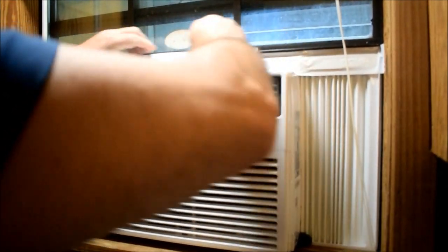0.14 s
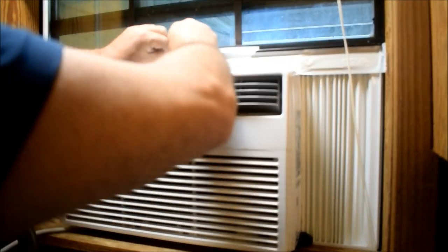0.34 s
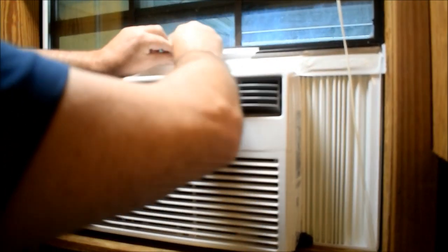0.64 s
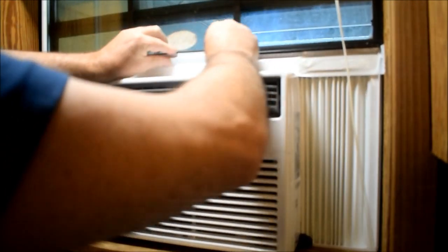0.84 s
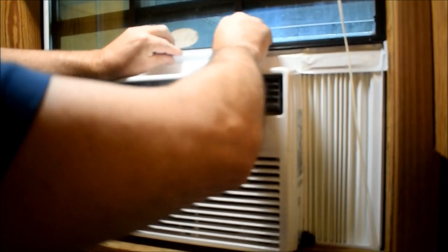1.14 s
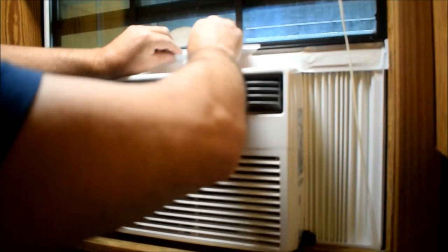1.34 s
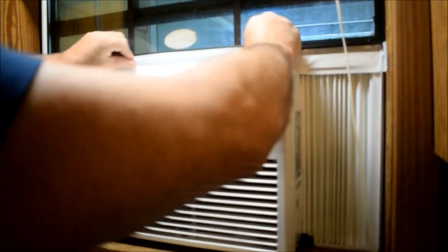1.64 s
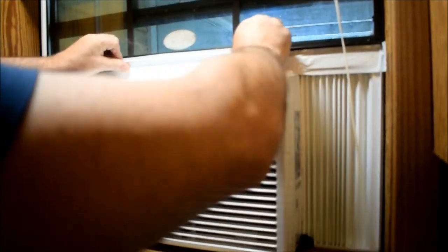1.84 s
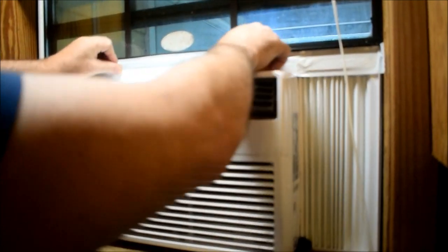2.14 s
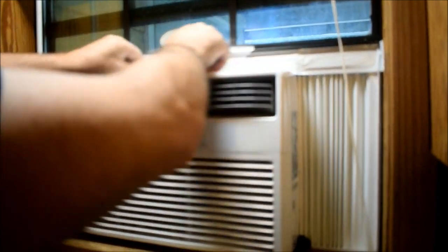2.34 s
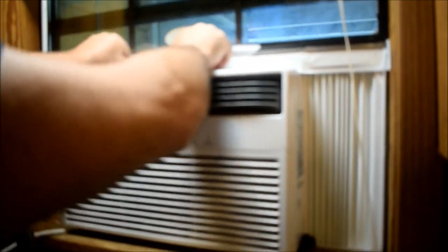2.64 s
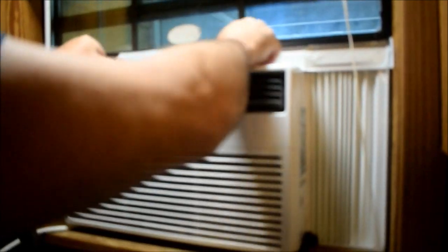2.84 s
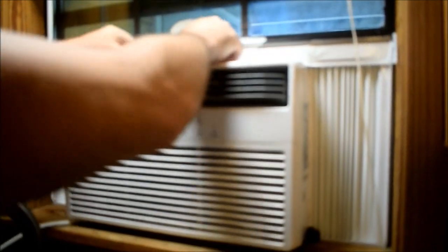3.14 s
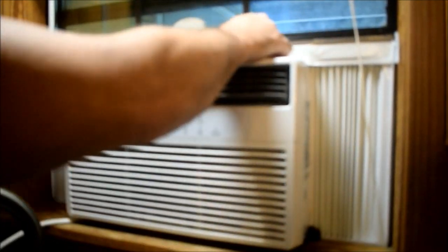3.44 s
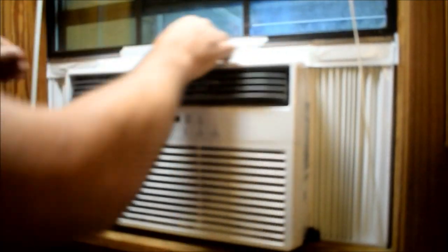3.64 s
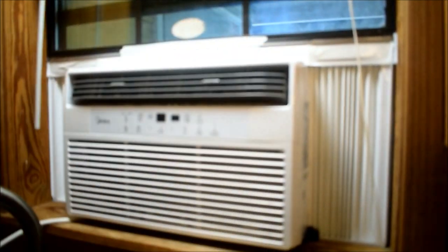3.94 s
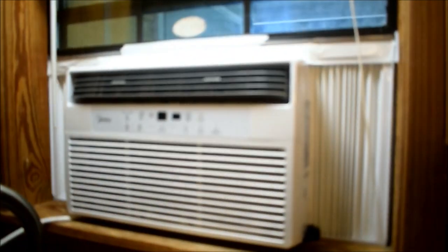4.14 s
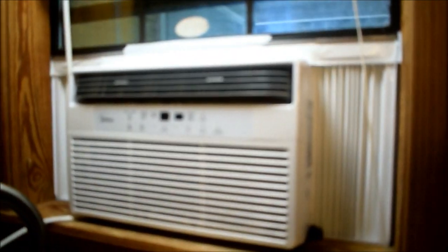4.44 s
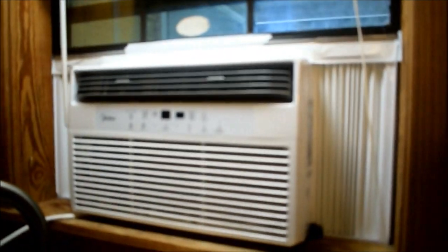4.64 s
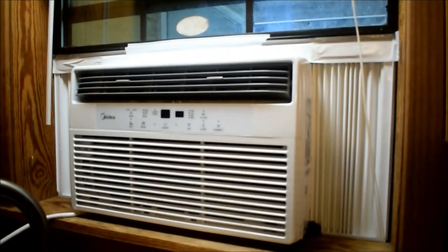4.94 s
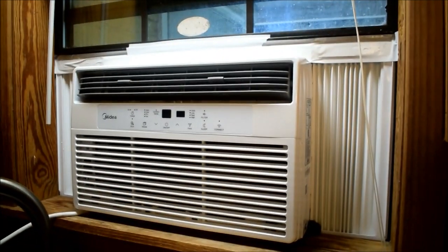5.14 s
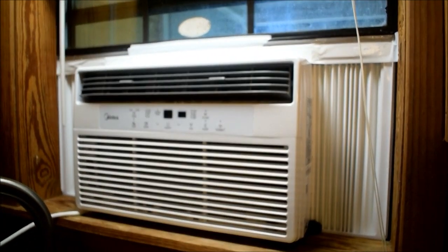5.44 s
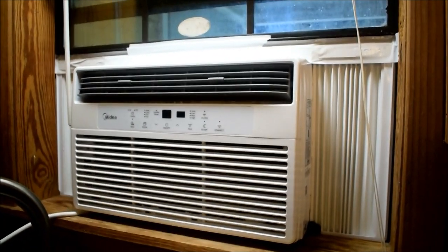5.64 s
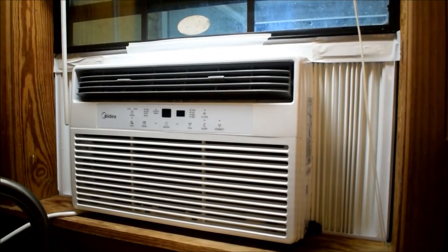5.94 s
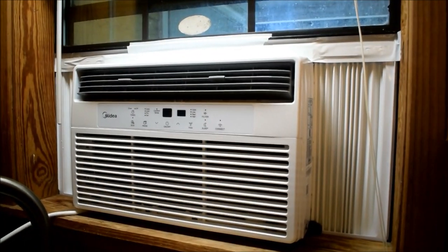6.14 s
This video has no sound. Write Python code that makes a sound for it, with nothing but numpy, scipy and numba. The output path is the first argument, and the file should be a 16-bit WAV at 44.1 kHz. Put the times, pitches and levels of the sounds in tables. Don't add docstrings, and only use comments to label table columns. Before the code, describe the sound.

Quiet knocks, tape crinkles and small plastic ticks in a small humming room, ending in a sudden harsh, distorted rip of adhesive tape.

```python
import sys
import numpy as np
from scipy import signal
from scipy.fft import rfft, irfft, next_fast_len
from scipy.io import wavfile
from numba import njit

SR = 44100
rng = np.random.default_rng(int(sys.argv[2]) if len(sys.argv) > 2 else 0)


def invert_db(level):
    return 10 ** (np.asarray(level, dtype=float) / 20)


def file_out(sig):
    cols = np.atleast_2d(sig).T
    lim = np.clip(cols, -1, 1)
    pcm = np.round(lim * 32767).astype(np.int16)
    wavfile.write(sys.argv[1], SR, pcm)


N = 276948

# (time [s], level [dB], hold [ms], strip mode [Hz]); the last row's mode holds from
# 5.981 s on
SLIPS = [(5.6105, -27.5, 1.1, 2230), (5.8054, -14.5, 2.1, 8800), (5.8462, -12.5, 3.4, 6530),
         (5.8902, -8, 5.1, 6000), (5.903, -16, 4.4, 3420), (5.916, -15, 2.7, 6000), (5.9272, -7, 7.3, 1730),
         (5.947, -10, 7.7, 1900), (5.957, -9.5, 10, 3600), (6.012, -10, 6, 1620), (6.02, -6, 15, 2900),
         (6.041, -3, 6, 4320), (6.052, -6.5, 7, 3030), (6.064, -5, 27, 4300), (6.082, -2.5, 20.5, 3500),
         (6.1161, -0.5, 17.4, 3500), (6.1537, -1.3, 15.6, 4170), (6.1917, -2, 6.2, 2050),
         (6.2214, -1, 4.5, 2210), (6.238, -2, 6.1, 4100), (6.2545, -2.5, 6.8, 2220),
         (6.265, -5.5, 5.9, 2200), (6.277, -7, 4.8, 4030), (5.981, -11, 4, 2610)]
# (time [s], tearing [dB], drum pitch of the free strip [Hz], drum rattle [dB], clean swing [dB])
PULL = [(5.88, -59, 979, -49, -70), (5.93, -28, 922, -33, -60), (5.955, -18, 900, -24, -28),
        (5.98, -9, 670, -23.5, -22), (6.0, -2, 594, -18, -18), (6.012, -12, 468, -19, -27),
        (6.025, -11, 316, -25, -10), (6.04, -17, 304.5, -24, -9), (6.062, -26, 291, -28, -10),
        (6.085, -26, 223, -24, -7.5), (6.098, -40, 216, -40, -30), (6.11, -48, 237, -47, -70),
        (6.28, -43, 262, -43, -70)]
# (frequency [Hz], density [dB per Hz])
SHORT_STRIP_COLOUR = [(210, -55), (350, -22), (1400, -11), (1900, -4), (2650, -6), (3530, -3), (6270, 0),
                      (9950, 2.5), (15800, -15)]
# (frequency [Hz], density [dB per Hz])
LONG_STRIP_COLOUR = [(220, -56), (380, -1), (424, 2.5), (527, -3), (698, 0.5), (1600, -8.5), (4260, -11),
                     (5730, -7), (9440, -3.5), (15800, -13.5)]
# (frequency [Hz], width [Hz], boost [ratio])
STRIP_MODES = [(1900, 1700, 4.9), (3600, 1900, 8.9), (6300, 170, 2.1), (7660, 220, 0.61)]
# (time [s], peak level [dB])
SNAPS = [(5.370, -26.5), (5.3735, -40), (5.380, -34), (5.3859, -29), (5.391, -30), (5.3945, -25),
         (5.3995, -24), (5.404, -28), (5.410, -25), (5.415, -22), (5.4225, -20), (5.431, -20), (5.436, -17),
         (5.4394, -15), (5.447, -17), (5.4533, -25), (5.458, -16), (5.461, -12.5), (5.4709, -16.5),
         (5.6115, -9.5), (5.6145, -20), (5.721, -36), (5.8057, 1), (5.8225, -17), (5.8245, -20),
         (5.8466, 3), (5.8488, -11), (5.8499, 1), (5.8923, -10), (5.8978, 0), (5.9031, -13), (5.908, -2),
         (5.9155, -5), (5.9177, 2), (5.9264, -11), (5.9465, 0), (6.1165, 3), (6.1537, -4), (6.1924, -5),
         (6.2212, 6), (6.239, -1), (6.2545, -2)]
# (frequency [Hz], width [Hz], share [ratio])
SNAP_MODES = [(1900, 470, .6), (3600, 570, 0.94), (6300, 1600, 0.47), (9670, 5200, 0.39)]
# (time [s], peak level [dB], pitch [Hz])
FLAPS = [
    (6.098, -13, 225),
    (6.124, -9, 240),
    (6.134, -9.5, 188),
    (6.165, -5, 248),
    (6.195, -5.5, 245),
    (6.223, -1, 273),
    (6.24, -9, 260),
    (6.259, -2, 250),
    (6.271, -10, 267),
]
# (start [s], rise [s], level [dB], t60 [s], low mode of the strip [dB], hold [s])
PEELS = [
    (0.111, 0.0064, -32, 0.36, -64, 0.018),
    (5.383, 0.046, -29.5, 0.11, -37.5, 0.039),
]
# (frequency [Hz], density [dB per Hz])
PEEL_COLOURS = [
    [(880, -49), (1500, -24), (2340, -15), (2480, -13), (4750, 0), (7260, -9), (15800, -44)],
    [(760, -41), (1300, -10), (2700, -5.5), (3510, -6.5), (6990, -4.5), (11000, -7), (15800, -19)],
]
LOW_MODE_TIME = (5.41, 5.45)
LOW_MODE_PITCH = (1900, 900)
# (time [s], body [dB], tick re body [dB], contact [ms], body pitch [Hz])
TAPS = [(0.202, -29.5, 0, 16.5, 977), (0.602, -26.5, 2, 5.54, 1150), (0.679, -14, -6.5, 4.7, 900),
        (0.728, -14.5, -6.5, 2.4, 610), (0.783, -33, -12, 2.6, 800), (0.832, -18, -17, 3.1, 720),
        (0.879, -32, -7, 2.1, 710), (0.895, -14, -13, 3.2, 870), (0.935, -31, -3.5, 4.6, 540),
        (1.108, -31.5, -7, 13.6, 1350), (1.16, -32.5, -4.5, 15, 795), (1.373, -28.5, -7, 4.2, 605),
        (1.466, -32.5, -6, 8.1, 553), (1.492, -32.5, -8, 4.7, 710), (1.633, -27, -20, 7.5, 775),
        (2.555, -34.5, -8, 5.1, 680), (3.187, -34, 1, 8.2, 450), (4.269, -39, -9, 33, 950)]
# (time [s], thump [dB], body re thump [dB], contact [ms])
THUMPS = [(0.009, -35, -19, 6.9), (0.516, -31, -3.5, 6.4), (1.334, -21.5, 3, 7.7), (1.97, -24.5, 4, 5.5),
          (2.265, -42.5, 6, 15), (2.41, -27, -5.5, 8.6), (2.447, -36, 4.5, 10.6), (2.61, -40.5, 1, 5.2),
          (3.102, -32.5, 0.5, 10), (3.131, -19.5, -2.5, 5), (3.158, -27, -7, 13), (4.377, -33, -25, 3.6),
          (4.496, -35.5, -19, 0.85), (5.785, -37.5, 4, 8.6)]
# (time [s], tick [dB], snap re tick [dB], contact [ms])
CRINKLES = [(0.009, -50, 7, 7.7), (0.357, -37, -2.5, 9.5), (0.367, -34.5, 0, 5.5), (0.21, -37, 3, 13),
            (0.443, -47, 2, 6), (0.452, -38, -4, 12), (0.517, -33.5, 1, 9.1), (0.68, -37.5, 9.5, 5.9),
            (0.698, -19.5, -6.5, 5.2), (0.899, -28.5, -16, 4.5), (1.106, -38, 2.5, 10.5),
            (1.335, -24, -7, 3.3), (1.633, -40, 1, 10), (1.971, -34.5, -8, 6.4), (2.029, -42.5, -4, 4.1),
            (2.191, -28.5, -32, 5.9), (2.509, -37.5, -5, 8.3), (3.131, -28, -15, 8.7),
            (3.246, -39, -5.5, 9), (3.992, -28, -25, 5.5), (4.32, -43, -26, 17), (4.567, -43, -3.5, 2.9),
            (5.6105, -21.5, -9, 8), (1.3398, -34, -8, 2.8), (1.347, -33, -12, 2.7), (1.976, -37, -9, 3.1),
            (3.138, -34, -10, 3), (3.342, -41, -6, 4), (2.648, -44, -2, 4)]
# (low edge [Hz], high edge [Hz], ring [contact lengths], mode sharpness [Q])
CASING = [
    (340, 1390, 1.1, 3.6),
    (80.4, 403, 3.5, 0.87),
    (1420, 4480, .9, 2.3),
    (4140, 11000, .7, 4.7),
]
# (time [s], lower mode [dB], upper modes [dB])
TICKS = [
    (3.454, -35, -66),
    (3.9943, -24, -33),
    (4.3214, -29, -42.5),
    (4.6029, -34, -57),
    (4.8399, -43, -65),
    (4.865, -47, -66),
    (4.8928, -46, -64),
    (4.912, -49, -62),
    (5.0155, -46, -65),
]
# (frequency [Hz], level [dB], t60 [s], strength column of TICKS [index])
TICK_MODES = [(2040, -9, .018, 1), (3600, -1.5, .012, 2), (3650, -24, .2, 2), (4300, 0, .01, 2)]
# (start [s], rise [s], level [dB], t60 [s], stop [s])
SQUEAK = (0.732, .012, -48.5, .8, .895)
# (frequency [Hz], width [Hz], level [dB])
SQUEAK_MODES = [(1340, 160, -2), (1990, 150, 0), (4680, 330, -3)]
# (start [s], rise [s], hold [s], level [dB], hollowness [dB])
STROKES = [(0.0, 0.0016, 0.011, -55, 5.5), (0.314, 0.037, 0.2, -53, 0), (0.6, 0.083, 0.11, -44.5, -5),
           (0.808, .09, 0.034, -45, -11), (1.057, 0.018, 0.22, -52.5, -2), (1.31, 0.024, 0.11, -47.5, 2),
           (1.361, 0.1, 0.18, -44, -4), (1.68, .02, 0.088, -57.5, 1.5), (1.768, 0.079, 0.066, -53, -2.5),
           (1.954, 0.033, 0.22, -57.5, 2), (2.42, 0.34, .015, -44.5, 9), (2.6, 0.04, .13, -51, 5.5),
           (3.099, 0.03, 0.028, -50.5, 0), (3.199, 0.092, 0.082, -48.5, 8), (3.396, 0.018, 0.07, -58.5, 5),
           (3.52, 0.024, 0.043, -58, -1), (3.97, .02, 0.047, -58, -1), (4.048, 0.085, 0.13, -58, 5),
           (5.584, 0.016, 0.12, -51.5, -15), (5.769, 0.039, 0.12, -49.5, -1)]
# (start [s], rise [s], hold [s], hiss [dB], t60 [s])
SWISHES = [(0.0, 0.0015, 0.0089, -62, 0.15), (0.11, 0.024, .01, -48, 0.32), (0.2, .008, 0.017, -59, 0.14),
           (0.343, 0.016, 0.0092, -76, 0.071), (0.5, 0.015, 0.0085, -68, .18),
           (0.75, 0.041, 0.12, -74, 0.47), (1.087, 0.019, 0.0079, -57, 0.099),
           (1.63, 0.023, 0.021, -50.5, 0.11), (2.058, 0.036, 0.018, -66, 0.17),
           (2.162, 0.026, .005, -54, 0.059), (2.235, 0.043, 0.073, -68, .4), (2.565, 0.031, .02, -54, .2),
           (2.658, 0.023, 0.02, -49, 0.25), (3.326, 0.024, 0.025, -58, 0.13),
           (3.525, 0.013, 0.037, -68, .3), (4.476, .03, 0.018, -69, .15), (5.255, 0.11, 0.058, -63, 0.22),
           (5.372, 0.0026, 0.0069, -38, 0.16), (5.376, 0.025, 0.06, -41, 0.22),
           (5.72, 0.0025, .004, -58, .12), (5.625, .02, 0.11, -77, 0.62)]
# (rumble [dB], whoosh [dB], rub [dB], hiss [dB])
REST_LEVELS = (-60.5, -60.5, -60.5, -67)
# (rumble [dB], whoosh [dB], rub [dB], hiss [dB])
HANDS_OFF_CHANGE = (-0.71, -0.31, -1.2, -0.35)
# (frequency [Hz], density [dB per Hz])
FLOOR_COLOUR = [(15, -28), (25, -3.5), (59, 4.5), (137, -14), (179, -7.5), (342, -12.5), (981, -29),
                (1320, -24), (3490, -36), (4210, -43), (7420, -62), (13400, -64), (15800, -65)]
# (frequency [Hz], width [Hz], level [dB])
HUM_TONES = [(56.2, 8.2, -48.5), (113.6, 16.3, -52.5)]
# (time [s], level [dB])
MOTOR_LEVEL = [(0.0, -48.5), (0.68, -54), (1.48, -47.5), (3.0, -52.5), (5.36, -54), (5.8, -57.5)]
# (start [s], rise [s], hold [s], level [dB], t60 [s], pitch [Hz])
HUM_SWELL = (4.0, 0.36, 0.3, -48, 0.1, 116)


def rip():
    tear_db, drum_hz, drum_db, swing_db = in_time(PULL)
    now = np.arange(N) / SR
    pulling = now > PULL[0][0]
    tearing, mode_hz = slip_bursts(invert_db(tear_db) * pulling)

    snaps = crackle(per_s=7000, spread_db=4) * invert_db(3.5 * drift(260) + 2.5 * drift(75))
    ringing = sum(boost * resonance(snaps, hz, width) for hz, width, boost in STRIP_MODES)
    snaps = rms_one(snaps + 0.16 * ringing)

    length = np.clip((now - 5.91) / 0.051, 0, 1)
    colour = (1 - length) * coloured(snaps, SHORT_STRIP_COLOUR) + length * coloured(snaps, LONG_STRIP_COLOUR)
    colour = rms_one(colour + 1.29 * gliding(colour, mode_hz, 2.4, SR))

    rattle = (invert_db(drum_db) * pulling + invert_db(-31) * (now > PULL[-3][0])) * snaps
    drum = gliding(gliding(rattle, drum_hz, 3.6, SR), drum_hz, 3.6, SR)
    overtone = gliding(tearing * snaps, drum_hz * 2, 1.0, SR)
    overtone = overtone * np.clip((6.04 - now) / 0.085, 0, 1) * length

    tear = tearing * colour + 2 * overtone
    lows = signal.sosfiltfilt(signal.butter(3, 560, fs=SR, output="sos"), tear)
    tear = tear - lows * np.clip((drum_hz - 320) / 200, 0, 0.95)
    swing = invert_db(swing_db) * np.sin(2 * np.pi * np.cumsum(drum_hz) / SR)
    return band(tear + 23 * drum + swing, 93, 19300)


def slip_bursts(tearing):
    t = np.arange(round(0.25 * SR)) / SR
    mode_hz = np.full(N, float(SLIPS[0][3]))
    for s, level_db, hold_ms, hz in SLIPS:
        at = round(s * SR)
        mode_hz[at:] = hz
        t60 = np.clip(0.024 * invert_db(-0.62 * level_db), 0.012, 0.09)
        burst = invert_db(level_db - 60 * np.maximum(t - hold_ms / 1000, 0) / t60)
        crack = invert_db(level_db + 3.5 - 60 * t / 0.0058)
        tearing[at:at + len(t)] += (burst + crack)[:N - at]
    return tearing, mode_hz


def snaps_alone():
    s, peak_db = np.transpose(SNAPS)
    chance_db = rng.normal(0, 3.5, (len(SNAP_MODES), len(s)))
    modes = [(6000, 11000, 0.74)] + list(SNAP_MODES)
    out = 0
    for (hz, width, share), strength_db in zip(modes, np.vstack([0 * s, chance_db])):
        clicks = np.full(N, 1e-18)
        clicks[np.round(s * SR).astype(int)] = invert_db(peak_db + strength_db)
        out = out + share * resonance(clicks, hz, width) * SR / (2 * np.pi * width)
    return 0.7 * band(out, 1100, 15000)


def flaps():
    rise_s, t60, sag_per_s = 0.0055, 0.034, 7.0
    out, t = np.zeros(N + SR), np.arange(round(0.15 * SR)) / SR
    for s, peak_db, hz in FLAPS:
        phase = 2 * np.pi * 1.133 * hz * t * np.exp(-sag_per_s * t)
        gain = (1 - np.exp(-t / rise_s)) * invert_db(peak_db + 10 - 60 * t / t60)
        out[round(s * SR):][:len(t)] += gain * (np.sin(phase) + 0.35 * np.sin(phase / 2))
    return band(band(out[:N], 93, 1100), 93, 1100)


def peels():
    out, snaps = np.zeros(N), crackle(per_s=9000, spread_db=2.5)
    sinking_hz = np.interp(np.arange(N) / SR, LOW_MODE_TIME, LOW_MODE_PITCH)
    low_mode = rms_one(gliding(band(snaps, 520, 2300), sinking_hz, 2.9, SR))
    for (start, rise, level_db, t60, low_db, hold), colour in zip(PEELS, PEEL_COLOURS):
        peel = invert_db(level_db) * coloured(snaps, colour) + invert_db(low_db) * low_mode
        out += swell(start, rise, hold, t60, 23) * peel
    return out


def knocks():
    t = np.arange(round(0.25 * SR)) / SR
    out = np.zeros(N + len(t))
    for s, *levels_db, contact_ms, body_hz in contacts():
        contact = np.clip(contact_ms, 0.5, 40) / 1000
        push = rng.standard_normal(len(t)) * (1 - np.exp(-t / (11.2 * contact ** 2)))
        push[round(25 * contact ** 2 * SR)] += 0.011 / contact
        for level_db, (low, high, ring, sharp), spot in zip(levels_db, CASING, rng.random(len(CASING))):
            part = band(band(push * np.exp(-t / (ring * contact)), low, high), low, high)
            if body_hz > 0 and low < body_hz < high:
                hz, strength = body_hz, 2.2 / (1 + contact_ms / 5)
            else:
                hz, strength = low * (high / low) ** (0.069 + 0.7 * spot), 0.6
            part = part + strength * resonance(part, hz, hz / sharp)
            if low < 100:
                boom = np.sin(2 * np.pi * 175 * t) * np.exp(-t / (0.87 * contact))
                part = part / np.abs(part).max() + 0.66 * boom
            out[round(s * SR):][:len(t)] += invert_db(level_db) * part / np.abs(part).max()
    return out[:N]


def contacts():
    rows = []
    for s, body, tick, ms, hz in TAPS:
        rows.append((s, body, body - 18.5, body + tick, body + tick - 17, ms, hz))
    for s, thump, rel, ms in THUMPS:
        body = thump + rel
        rows.append((s, body, thump, body - 13, body - 19.5, ms, 672))
    for s, tick, snap, ms in CRINKLES:
        rows.append((s, tick - 10, tick - 28.5, tick, tick + snap, ms, 0))
    return rows


def ticks():
    n = np.arange(300)
    scratch = rng.standard_normal(300) * np.exp(-n / 90) / 8
    at = [round(row[0] * SR) for row in TICKS]
    out = 0
    for hz, db, t60, which in TICK_MODES:
        drive = np.abs(scratch @ np.exp(-2j * np.pi * hz / SR * n))
        clicks = np.full(N, 1e-18)
        clicks[at] = invert_db(np.array(TICKS)[:, which] + db) / drive
        out = out + t60 * SR / 7 * resonance(signal.fftconvolve(clicks, scratch)[:N], hz, 2.2 / t60)
    return band(out, 1500, 5500)


def squeak():
    start, rise, level_db, t60, stop = SQUEAK
    slips = crackle(per_s=2500, spread_db=5.5) * invert_db(drift(57))
    tone = 0
    for hz, width, db in SQUEAK_MODES:
        tone = tone + invert_db(db) * rms_one(resonance(resonance(slips, hz, width), hz, width))
    lift_off = np.clip((stop - np.arange(N) / SR) / 0.012, 0, 1)
    return invert_db(level_db + 6.5) * swell(start, rise, 0, t60) * lift_off * tone


def rubbing():
    grain = crackle(per_s=10000, spread_db=1.5) * invert_db(drift(44))
    rumble = band(band(grain, 220, 620), 220, 620)
    whoosh = resonance(band(grain, 660, 1200), 880, 320)
    rub = band(grain, 1300, 5000) + 0.5 * band(grain, 1300, 2500)
    hiss = band(grain, 3430, 9620) + 0.23 * band(grain, 8100, 14200)

    fidget_db = 1.0 * drift(3.1)
    off = np.clip((np.arange(N) / SR - 4.3) / 0.24, 0, 1)
    gains = [invert_db(db + fidget_db + off * off_db) for db, off_db in zip(REST_LEVELS, HANDS_OFF_CHANGE)]
    for start, rise, hold, db, hollow_db in STROKES:
        shape = swell(start, rise, hold, 0.4, 18)
        stroke = (invert_db(db - 2 + 0.17 * hollow_db) * shape,
                  invert_db(db + hollow_db) * shape ** 1.6,
                  invert_db(db) * shape,
                  invert_db(-49.5) * (invert_db(db + 45) * shape) ** 1.19)
        gains = [np.maximum(a, b) for a, b in zip(gains, stroke)]

    airy = sum(invert_db(db) * swell(start, rise, hold, t60) for start, rise, hold, db, t60 in SWISHES)
    swish = airy * rms_one(band(grain, 3560, 12600))
    layers = (rumble, whoosh, rub, hiss)
    return swish + sum(gain * rms_one(layer) for gain, layer in zip(gains, layers))


def room(x):
    t60, wall_cut_hz = 0.31, 2750
    t = np.arange(round(0.5 * SR)) / SR
    white = rng.standard_normal(len(t)) * (t > 0.003)
    lows = signal.lfilter(*signal.butter(1, wall_cut_hz, fs=SR), white)
    answer = lows * invert_db(-60 * t / t60) + (white - lows) * invert_db(-60 * t / (0.28 * t60))
    return signal.fftconvolve(x, answer / np.sqrt(np.sum(answer ** 2)))[:N]


def hum():
    floor = invert_db(-42.5 - 5 + drift(2.73)) * coloured(rng.standard_normal(N), FLOOR_COLOUR)
    white = rng.standard_normal(N + SR)
    tones = 0
    for hz, width, db in HUM_TONES:
        tones = tones + invert_db(db) * rms_one(resonance(resonance(white, hz, width), hz, width)[SR:])
    start, rise, hold, swelling_db, t60, swelling_hz = HUM_SWELL
    swelling = rms_one(resonance(white, swelling_hz, 20)[SR:])
    swelling = invert_db(swelling_db) * swell(start, rise, hold, t60) * swelling
    motor_db, = in_time(MOTOR_LEVEL)
    motor = np.sqrt(2) * invert_db(motor_db + 0.5 * drift(3.23)) * np.sin(2 * np.pi * 175 * np.arange(N) / SR)
    return floor + tones + swelling + motor


def crackle(per_s, spread_db):
    sizes = invert_db(spread_db * np.minimum(rng.exponential(1, N), 4)) * rng.choice([-1, 1], N)
    return rms_one(sizes * (rng.random(N) < per_s / SR) + 1e-9)


def swell(start, rise, hold, t60, rise_db=26.0):
    t = np.arange(N) / SR - start
    rise, hold = max(rise, 0.001), max(hold, 0)
    climb_db = rise_db * np.minimum(t / rise - 1, 0)
    fall_db = 60 * np.maximum(t - rise - hold, 0) / max(t60, 0.02)
    return (t >= 0) * invert_db(climb_db - fall_db)


def drift(rate):
    knots = rng.standard_normal(N // 20 + 4)
    return np.interp(np.arange(N) * rate / SR, np.arange(len(knots)), knots)


def in_time(rows):
    s, *columns = np.transpose(rows)
    return [np.interp(np.arange(N) / SR, s, column) for column in columns]


def rms_one(x):
    return x / np.sqrt(np.mean(x ** 2) + 1e-20)


def band(x, low_hz, high_hz):
    return signal.sosfilt(signal.butter(2, [low_hz, high_hz], "band", fs=SR, output="sos"), x)


def resonance(x, hz, width_hz):
    r = np.exp(-np.pi * width_hz / SR)
    feedback = [1, -2 * r * np.cos(2 * np.pi * hz / SR), r * r]
    return signal.lfilter(np.array([1, 0, -1]) * (1 - r * r) / 2, feedback, x)


@njit
def gliding(x, hz, sharp, sr):
    y = np.zeros(len(x))
    for i in range(2, len(x)):
        r = np.exp(-np.pi * hz[i] / sharp / sr)
        push = (1 - r * r) / 2 * (x[i] - x[i - 2])
        y[i] = push + 2 * r * np.cos(2 * np.pi * hz[i] / sr) * y[i - 1] - r * r * y[i - 2]
    return y


def coloured(x, spectrum):
    hz, level_db = np.transpose(spectrum)
    size = next_fast_len(len(x))
    grid_hz = np.arange(size // 2 + 1) * SR / size + 1
    gain = invert_db(np.interp(np.log(grid_hz), np.log(hz), level_db))
    return rms_one(irfft(rfft(x, size) * gain, size)[:len(x)])


def scene():
    near = rip() + snaps_alone() + flaps() + peels() + knocks() + ticks() + squeak()
    return (near + invert_db(-10) * room(near) + rubbing() + hum())[None]


def low_pass(x):
    return signal.sosfilt(signal.butter(12, 15950, fs=SR, output="sos"), x)


def record(dry):
    overload = 0.9
    top = signal.cheby2(14, 50, 16700, fs=SR, output="sos")
    rumble_cut = signal.butter(2, 36, "high", fs=SR, output="sos")
    cut = signal.sosfilt(rumble_cut, signal.sosfilt(top, dry))
    clipped = cut / (1 + np.abs(cut / overload) ** 6) ** (1 / 6)
    mix = signal.sosfilt(top, clipped)
    return low_pass(mix)


dry = scene()
out = record(dry)
file_out(out)
```